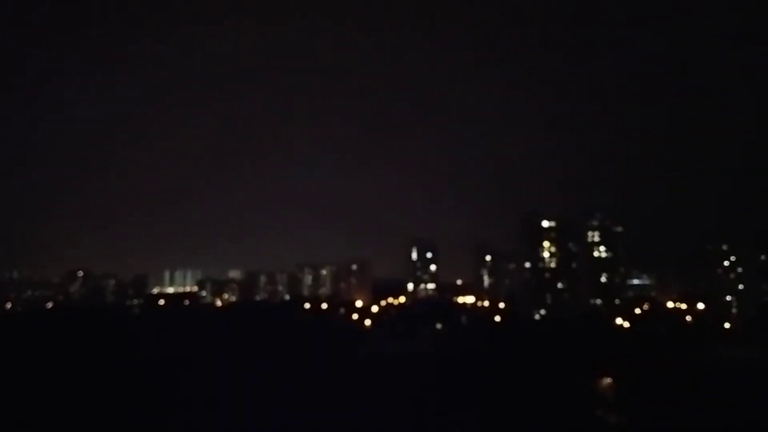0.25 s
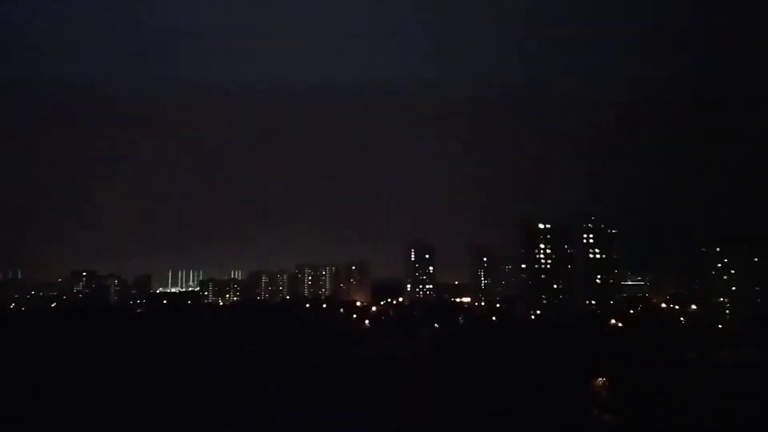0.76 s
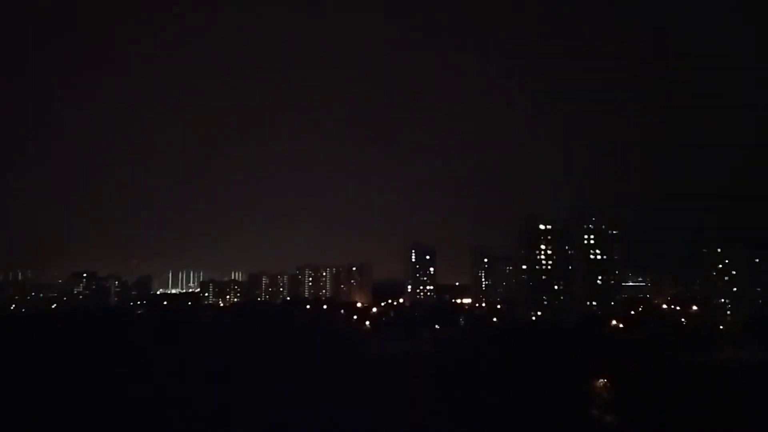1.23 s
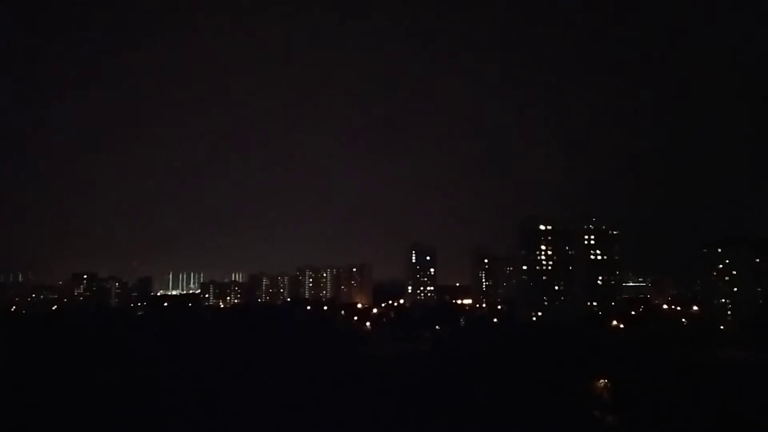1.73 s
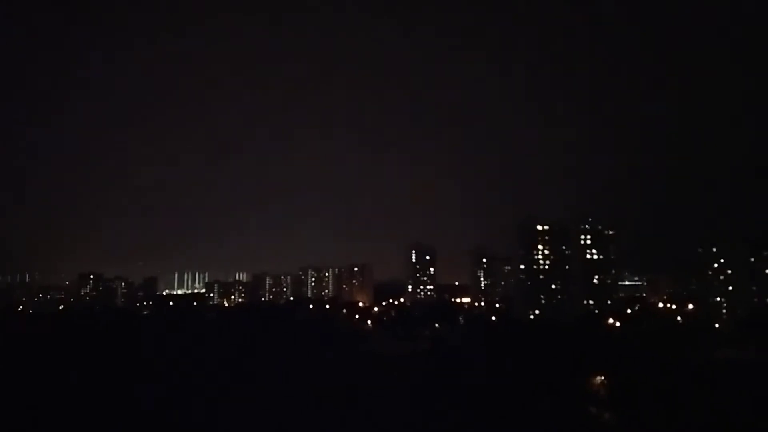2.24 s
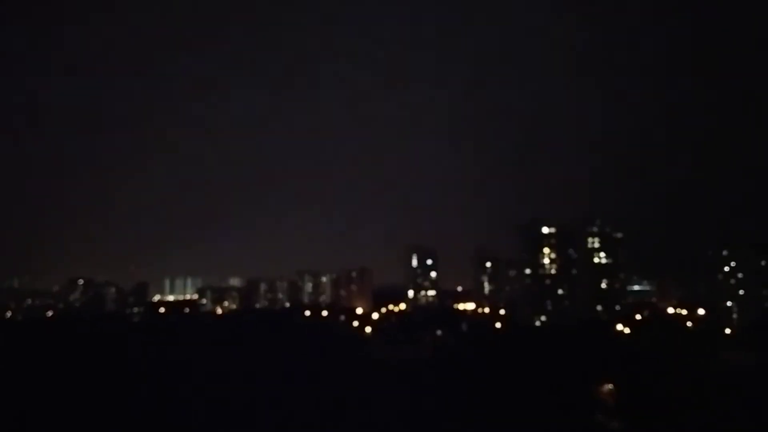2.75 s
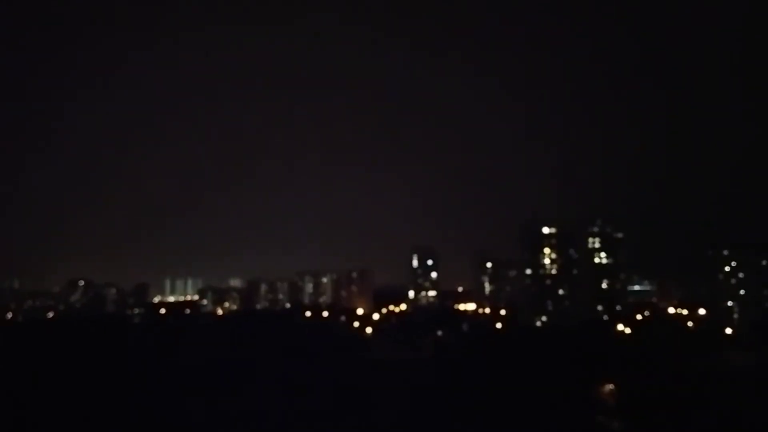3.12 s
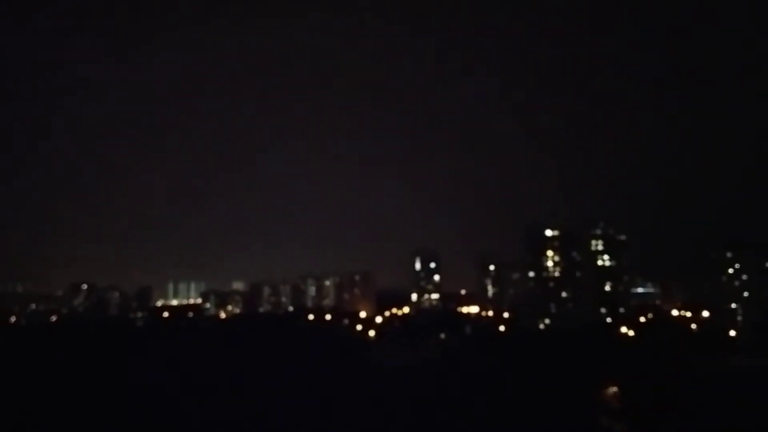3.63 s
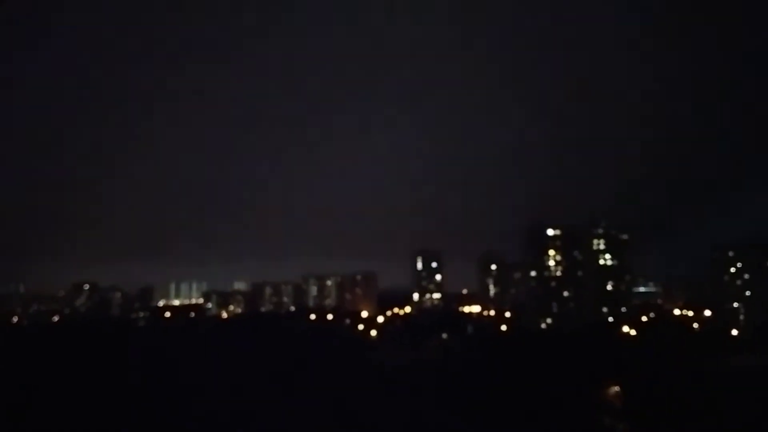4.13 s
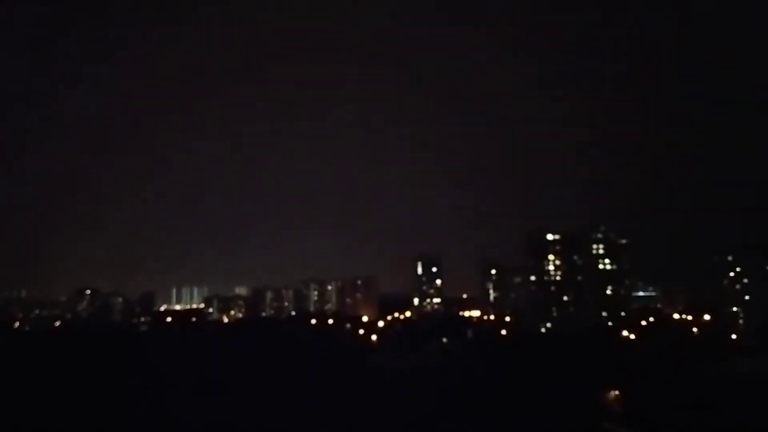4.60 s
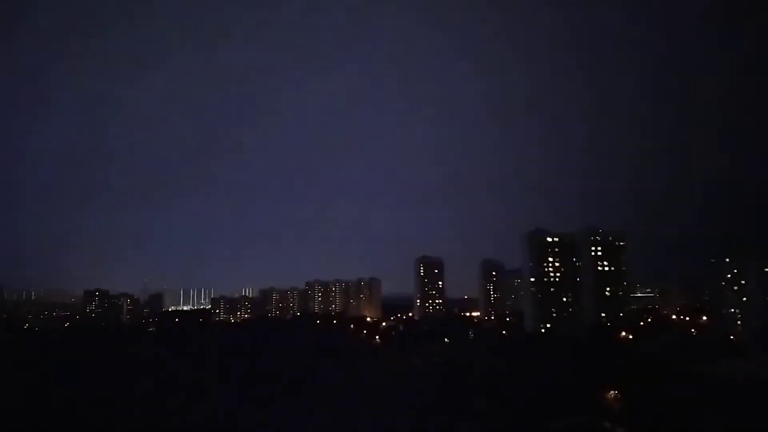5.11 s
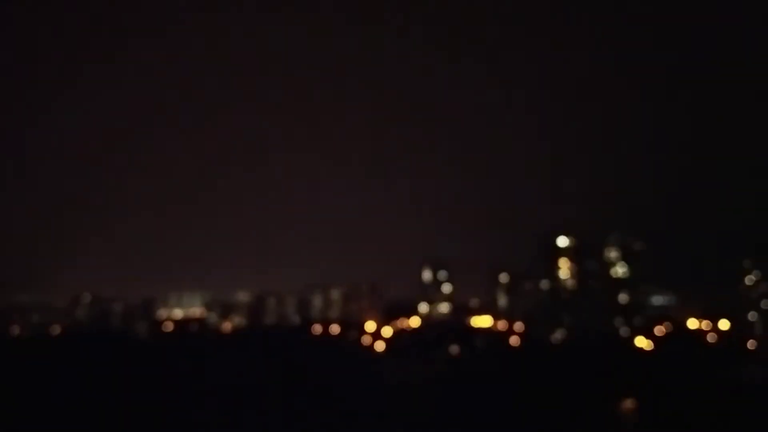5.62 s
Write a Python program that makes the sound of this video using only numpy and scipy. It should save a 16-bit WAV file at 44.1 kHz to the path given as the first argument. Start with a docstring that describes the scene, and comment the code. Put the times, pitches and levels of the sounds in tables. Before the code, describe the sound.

Thunder heard from a high open window over a city at night, picked up by a phone. Heavy low claps tumble at once, thin to a rumble after a second, then a brighter, harder burst cracks around two and a half seconds. Weaker knocks and rumbles follow to the end, over very faint hiss and sparse tiny drips.

```python
"""Thunder over a city at night, heard by a phone at an open window high above the roofs.
Shock fronts from the crooked lightning channel, smeared by house fronts, roll on from the start.
A first group of claps fades by 1.4 s, a bright second one peaks near 2.65 s, weaker ones follow to the end.
Hiss swells and two faint chirps sound from about 4 s; steady hiss, drips and thin whine lie under it all.
Thunder is N-wave noise in four levelled bands; the rest is filtered noise, short rings and sines."""
import sys
import numpy as np
from scipy import signal
from scipy.fft import rfft, irfft
from scipy.io import wavfile
from scipy.ndimage import uniform_filter1d, minimum_filter1d

SR = 44100
rng = np.random.default_rng(int(sys.argv[2]) if len(sys.argv) > 2 else 0)


def file_out(sig):
    """Save sig as 16-bit WAV at sys.argv[1]."""
    # one column per channel
    cols = np.atleast_2d(sig).T
    # limit, then scale
    lim = np.clip(cols, -1, 1)
    pcm = np.round(lim * 32767).astype(np.int16)
    wavfile.write(sys.argv[1], SR, pcm)


N = 258426
TIME = np.arange(N) / SR
FREQ = np.fft.rfftfreq(N, 1 / SR) + 1e-3  # offset keeps log(FREQ) finite

# roll between claps: t/s, boom level/dB, body level/dB, crackle level/dB, sharp edge level/dB
ROLL_LEVELS = [(0, -25, -31.5, -41, -53.5), (.7, -29.5, -35.5, -42.5, -51.5), (1.2, -29, -40.5, -43.5, -53),
               (1.5, -32, -38.5, -46, -57), (1.9, -34.5, -41.5, -44.5, -51.5),
               (2.23, -34.5, -39, -47.5, -55.5), (3.201, -36, -35.5, -44, -53), (3.8, -33, -36, -45, -56),
               (4.22, -37.5, -37.5, -43, -57), (4.75, -35, -34.5, -47, -59.5),
               (5.301, -34, -34.5, -44, -60), (5.86, -32.5, -36.5, -48, -62.5)]
# claps: t/s, boom level/dB, brightness/dB, extra body/dB, rise/s, fade constant/s
CLAP_EVENTS = [(.045, -27, -13, 13, 0.012, 0.025), (0.19, -16.5, -2, 1.5, 0.025, 0.11),
               (.243, -27, 6.5, 4, 0.0083, 0.068), (.335, -18.5, 1, -5.5, 0.0069, 0.057),
               (.388, -16, -3.5, -8, 0.011, 0.034), (.428, -18, -6, -2, 0.0086, 0.069),
               (.7, -24, -0.5, -6, 0.01, 0.037), (0.778, -20.5, -8, 1, 0.013, 0.056),
               (.838, -31, -2, 9, 0.027, .025), (0.891, -18.5, -6, 3, 0.011, 0.011),
               (.95, -25.5, -1, 0, 0.0094, 0.042), (1.04, -19, -12, 1, 0.0072, 0.023),
               (1.11, -20.5, -16, 5, 0.0085, 0.025), (1.17, -25, -16, -8, 0.019, 0.046),
               (1.235, -25.5, -1.5, -8, 0.017, 0.067), (1.345, -28, -13, -4, 0.0093, 0.013),
               (1.82, -48, 16, 0, .015, .037), (1.975, -28, -9, -5, 0.014, 0.029),
               (2.305, -36, 11.5, 0.5, 0.041, 0.065), (2.335, -26.5, -15, -5, 0.015, 0.051),
               (2.42, -25.5, 6, -4, 0.059, 0.44), (2.552, -27.5, 12.5, -0.5, 0.023, 0.31),
               (2.552, -32, 10.5, 6.5, 0.01, .03), (2.617, -20, 7, 1.5, 0.0085, 0.11),
               (2.645, -20, 10, 4, 0.019, 0.01), (2.726, -18, 3.5, 4.5, 0.0082, 0.029),
               (2.799, -21, 2, 4, 0.007, 0.059), (2.88, -20, 3, -2.5, 0.014, 0.19),
               (3.011, -15.5, -6, -2, 0.008, 0.032), (3.135, -24.5, -10, -7, 0.011, 0.036),
               (3.26, -29, -5, 8, 0.0078, 0.015), (3.385, -45, 4, 15, 0.0082, 0.021),
               (3.557, -25.5, 3, -13, 0.014, 0.017), (3.665, -35.5, 7, 1, 0.014, 0.028),
               (3.76, -40, -5, -1, 0.013, .06), (3.945, -36, 2, 1, 0.018, .025),
               (4.008, -28.5, -4.5, 11, 0.024, 0.031), (4.06, -30, -3.5, 4.5, 0.022, 0.086),
               (4.31, -37, 7, 5.5, 0.035, 0.047), (4.475, -34, -3, 5, 0.0074, 0.097),
               (4.565, -39, 3, 2, 0.024, .04), (4.795, -25.5, 2, 2, 0.017, 0.03),
               (4.95, -39, 7, 2, 0.0065, 0.016), (5.018, -26, -2.5, 2.5, 0.021, 0.035),
               (5.143, -30.5, -1, 4, 0.012, 0.14), (5.42, -32.5, 0.5, 6, 0.02, 0.056),
               (5.505, -16.5, -7.5, 3, 0.018, 0.022), (5.52, -28.5, 2, 3, 0.016, 0.076),
               (5.649, -24, -8, 8.5, .025, 0.038)]
# clap bands, boom to sharp edge: level re boom/dB, share of brightness/1, share of extra body/1
CLAP_BANDS = [(-1, 0.04, 0), (-6.5, 0.88, 1), (-16, 1.22, 0), (-29.5, 1.41, 0.12)]
# upper ends of boom, body, crackle and sharp edge: f/Hz
BAND_TOPS_HZ = [260.5, 579, 1387, 4000]
# centres of brief dips in roll level: t/s
LULL_TIMES_S = [0.145, .745, 1.295, 1.865, 2.055, 2.21, 3.305, 4.19, 4.675, 4.75, 4.895, 5.365]
LULL_DB, LULL_WIDTH_S = -2, 0.013
# thunder colour after its way through the air: f/Hz, gain/dB
AIR_GAIN = [(25, -38), (35, -26.5), (55, -18.5), (85, -2.5), (110, 2.5), (220, 0), (290, -3.5), (380, -5.5),
            (520, -7.5), (800, -10), (1150, -19), (2000, -38), (2600, -45), (3400, -67.5)]
# resonances of the window recess: f/Hz, width/Hz, lift/dB
RECESS_MODES = [(180.6, 39, 2), (224, 30, 4), (292.3, 13, 6), (464, 27, 5), (509.5, 33, 5), (567, 13, 1.5),
                (755, 38, 1.5), (847, 100, 1.5), (1044, 28, 3), (1154, 94, 4.5), (1540, 61, 4),
                (1880, 60, 6)]
# microphone ports, level difference: f/Hz, left minus right/dB
PORT_BALANCE = [(60, 13.6), (240, 13.3), (340, 12.26), (405, 10.3), (460, .3), (500, -2), (600, 1.8),
                (750, 0), (1000, 1), (1130, -1), (1330, 3.45), (1700, -.5), (2200, -4.5), (3000, -3)]
# microphone ports, likeness of their sound: f/Hz, likeness/1
PORT_LIKENESS = [(100, 1), (200, 0.89), (310, 0.94), (500, .94), (630, .69), (730, .88), (900, 1),
                 (970, 0.32), (1400, 0.21), (2500, 0.45)]
# microphone ports, phase lead of the left: f/Hz, phase/rad
PORT_LEAD = [(150, 0.09), (260, 0.19), (520, 0.15), (750, 0.25), (870, -0.68), (1020, .35), (1290, 1.1),
             (1380, -.4), (1650, -2.05), (2100, -1.3), (2300, 0)]
# hollow in the low mids, gain at its centre: t/s, gain/dB
HOLLOW_GAIN = [(0, -6), (1.5, 0), (2.65, -4), (2.95, 2), (3.4, 1.5), (5.86, 2)]
HOLLOW_HZ, HOLLOW_WIDTH_HZ = 366, 150
# recess ringing after hard fronts: t/s, level/dB, f/Hz, rise/s, fade constant/s
RING_EVENTS = [(.205, -22, 300, 0.033, 0.026), (2.558, -18.5, 263, 0.014, 0.035),
               (2.567, -20, 503, 0.017, 0.024), (2.635, -29, 765, 0.016, 0.02),
               (2.65, -15, 473, 0.012, 0.01)]
RING_WIDTH_HZ = 72
# bassless crackle from thin channel branches: t/s, level/dB, f/Hz, width/Hz, rise/s, fade constant/s
CRACKLE_BURSTS = [(.222, -32, 1030, 300, .028, 0.025), (.41, -40, 1000, 350, 0.018, .06),
                  (1.655, -38, 1120, 600, 0.031, 0.014), (1.69, -53, 1600, 500, 0.017, 0.037),
                  (2.345, -40, 1550, 650, 0.018, .018), (2.885, -46, 1600, 500, 0.016, .03),
                  (3.555, -53, 1570, 500, .015, .02), (3.745, -50, 1530, 500, 0.022, 0.022),
                  (4.05, -50, 1480, 500, 0.013, 0.024), (4.26, -55, 1500, 450, .02, .07),
                  (4.8, -49, 1240, 550, 0.03, 0.022), (5.525, -61, 1450, 500, .015, 0.023),
                  (5.665, -40, 730, 250, 0.027, 0.023)]
# faint chirps, before left trim: t/s, level/dB, f/Hz, width/Hz, rise/s, fade constant/s
CHIRP_EVENTS = [(4.145, -57, 2796, 20, .035, .03), (4.875, -59, 2480, 190, .03, .045)]
SWELL_S, SWELL_WIDTH_S, SWELL_HZ, SWELL_WIDTH_HZ = 4.22, 0.25, 7520, 970
# steady hiss density: f/Hz, left level/dB per Hz, right level/dB per Hz
HISS_DENSITY = [(100.2, -75, -81), (1470, -88, -90), (2420, -95, -88.5), (3080, -95.5, -93.5),
                (4750, -98, -96), (4720, -109, -105), (6130, -104, -99.5), (7300, -100, -94.5),
                (8430, -100, -102), (9600, -101, -114), (10360, -107, -121), (11700, -115, -115),
                (14000, -118, -118)]
# clear drips on the sill, before left and right trims: t/s, peak level/dB, f/Hz
CLEAR_DRIPS = [(0.5452, -55, 7600), (1.8377, -57, 7350), (2.3092, -57, 7500), (3.2096, -57, 7590),
               (3.5084, -58, 7080), (3.8202, -56, 7550), (5.1173, -48, 7100), (5.442, -49, 7430),
               (5.4789, -55, 7430), (5.8137, -59, 7700)]
# electrical whine, mid-flicker amplitude: f/Hz, left level/dB, right level/dB
WHINE_TONES = [(2670, -80, -68), (2760, -86, -71), (2787, -86, -75), (3020, -68.5, -85), (3229, -86, -87.5),
               (3500, -83, -87), (3660, -85, -84), (4452, -85.5, -75)]
CEILING, LIMITER_S, TOP_HZ = .74, .006, 14200  # ceiling re full scale


def thunder():
    """Roll and clap energies add in each band, boom to sharp edge; both drive one stream of fronts."""
    lead = np.exp(1j * shape(PORT_LEAD) * np.array([[1], [0]]))
    stream = filtered(hollowed(shock_stream()), lead)
    roll_s, *roll_db = np.transpose(ROLL_LEVELS)
    bands = np.diff([0 * FREQ] + [below(hz) for hz in BAND_TOPS_HZ], axis=0)
    _, boom_db, bright_db, body_db, _, _ = np.transpose(CLAP_EVENTS)
    clap_energy = np.array([clap(s, rise, fade) ** 2 for s, *_, rise, fade in CLAP_EVENTS])
    lull_db = LULL_DB * sum(bump(s, LULL_WIDTH_S) for s in LULL_TIMES_S)
    out = rings(stream)
    for band, level_db, (colour_db, bright_share, body_share) in zip(bands, roll_db, CLAP_BANDS):
        roll = undb(np.interp(TIME, roll_s, level_db) + lull_db)
        clap_db = boom_db + colour_db + bright_share * bright_db + body_share * body_db
        level = np.sqrt(roll ** 2 + undb(clap_db) ** 2 @ clap_energy)
        out = out + steady(filtered(stream, band), span_s=0.034) * level
    return out


def shock_stream():
    """Long waves reach both ports alike, short ones differ; air and window recess colour them."""
    shared, apart = (
        roofs(shock_fronts(per_s=1700, length_s=.005, spread_db=2.5), smear_s=0.12, echo_db=-4.0)
        for _ in range(2))
    likeness = np.clip(shape(PORT_LIKENESS), -1, 1)
    side = np.array([[1], [-1]])
    common = filtered(shared, np.sqrt(1 + likeness))
    stream = common + side * filtered(apart, np.sqrt(1 - likeness))
    recess_db = sum(db * resonance(hz, width_hz) for hz, width_hz, db in RECESS_MODES)
    ports = 2 / (1 + undb(-side * shape(PORT_BALANCE)))
    return filtered(stream, undb(shape(AIR_GAIN) + recess_db) * ports)


def shock_fronts(per_s, length_s, spread_db):
    """Pressure slope of scattered N-waves: a jump, a steady fall, a second jump."""
    chance = rng.random((N, 3))
    start = np.flatnonzero(chance[:, 0] < per_s / SR)
    size = undb(-spread_db * np.log(np.maximum(chance[start, 1], .01)))
    length = np.maximum(length_s * SR * (.5 + chance[start, 2]), 2).astype(int)
    end = start + length

    def at(where, weight):
        """Sum of weights landing on each sample."""
        return np.bincount(where, weight, 2 * N)[:N]

    fall = 2 * size / length
    jumps = at(start, size) + at(end, size)
    return jumps - np.cumsum(at(start, fall) - at(end, fall))


def roofs(x, smear_s, echo_db):
    """House fronts scatter each shock into a decaying noise tail, drawn afresh per call."""
    keep = np.exp(-1 / (smear_s * SR))
    energy = signal.lfilter([1 - keep], [1, -keep], x ** 2)
    return x + undb(echo_db) * np.sqrt(energy) * rng.standard_normal(N)


def hollowed(x):
    """Cut or lift the low mids with one resonance whose gain moves in time."""
    part = filtered(x, resonance(HOLLOW_HZ, HOLLOW_WIDTH_HZ))
    return x + (undb(np.interp(TIME, *np.transpose(HOLLOW_GAIN))) - 1) * part


def clap(start_s, rise_s, fade_s):
    """Envelope of a burst: linear build-up, exponential decay."""
    age_s = TIME - start_s
    return np.clip(age_s / rise_s, 0, 1) * np.exp(-np.maximum(age_s - rise_s, 0) / fade_s)


def rings(stream):
    """The window recess answers hard fronts with a brief hollow note: the stream in one resonance."""
    out = 0
    for s, db, hz, rise_s, fade_s in RING_EVENTS:
        note = steady(filtered(stream, resonance(hz, RING_WIDTH_HZ)), span_s=0.036)
        out = out + undb(db) * note * clap(s, rise_s, fade_s)
    return out


def bursts(events, span_s):
    """Sum of resonant noise bursts, each levelled and then shaped by its envelope."""
    out = 0
    for s, db, hz, width_hz, rise_s, fade_s in events:
        out = out + undb(db) * steady(rush(hz, width_hz), span_s) * clap(s, rise_s, fade_s)
    return out


def crackles(top_hz):
    """Short rough puffs of resonant noise, dulled by the air."""
    return filtered(bursts(CRACKLE_BURSTS, span_s=.03), below(top_hz))


def chirps(left_db):
    """Short high notes to the right, made of narrow noise."""
    return bursts(CHIRP_EVENTS, span_s=.05) * undb([[left_db], [0]])


def swell(left_db, right_db):
    """High resonant hiss that rises and falls once, mostly on the right."""
    noise = rush(SWELL_HZ, SWELL_WIDTH_HZ)
    return noise * bump(SWELL_S, SWELL_WIDTH_S) * undb([[left_db], [right_db]])


def hiss():
    """Even noise of set spectral density, unrelated at the two ports."""
    density_db = np.array([shape(HISS_DENSITY, axis=1), shape(HISS_DENSITY, axis=2)])
    return filtered(rng.standard_normal((2, N)), undb(density_db) * np.sqrt(SR / 2))


def drips(left_db, right_db, faint_db, count=40):
    """A few clear drips among many faint ones, all to the right."""
    faint = [(u * N / SR, faint_db + 5 * v, 7000 + 800 * w) for u, v, w in rng.random((count, 3))]
    out = np.zeros((2, N + SR))
    for s, db, hz in list(CLEAR_DRIPS) + faint:
        ring = drip(hz, ring_s=0.0022, width_hz=200)
        start = max(int(s * SR), 0)
        out[:, start:start + ring.shape[1]] += undb(db) * ring
    return out[:, :N] * undb([[left_db], [right_db]])


def drip(hz, ring_s, width_hz):
    """A drop's tiny splash: narrow noise that swells and fades within milliseconds, peak 1."""
    t = TIME[:2048]
    freq = np.fft.rfftfreq(len(t), 1 / SR)
    spectrum = rfft(rng.standard_normal((2, len(t))))
    spray = irfft(spectrum / (1 + (2 * (freq - hz) / width_hz) ** 2))
    ring = spray * t * np.exp(-t / ring_s)
    return ring / np.abs(ring).max(axis=1, keepdims=True)


def whine(waver_hz, flicker_db):
    """Faint sines that waver slowly in pitch and level; both settings are rms."""
    out = 0
    for hz, left_db, right_db in WHINE_TONES:
        drift, flicker = filtered(rng.standard_normal((2, N)), below(12))
        phase = 2 * np.pi * np.cumsum(hz + waver_hz * drift / drift.std()) / SR
        level = undb([[left_db], [right_db]]) * undb(flicker_db * flicker / flicker.std())
        out = out + level * np.sin(phase)
    return out


def rush(hz, width_hz):
    """Stereo noise in one resonance, rms 1."""
    x = filtered(rng.standard_normal((2, N)), resonance(hz, width_hz))
    return x / x.std()


def undb(db):
    """Decibels to gain."""
    return 10 ** (np.asarray(db) / 20)


def shape(points, axis=1):
    """One column of a table over frequency, joined on a log axis."""
    table = np.array(points)
    return np.interp(np.log(FREQ), np.log(table[:, 0]), table[:, axis])


def filtered(x, gain):
    """Apply a gain per frequency."""
    return irfft(rfft(x) * gain, N)


def below(hz):
    """Gain of a steep low-pass, 1/2 at its corner."""
    return 1 / (1 + (FREQ / hz) ** 8)


def resonance(hz, width_hz):
    """Gain of one resonance, 1 at its centre."""
    return 1 / (1 + (2 * (FREQ - hz) / width_hz) ** 2)


def bump(middle_s, width_s):
    """Gaussian in time, peak 1."""
    return np.exp(-.5 * ((TIME - middle_s) / width_s) ** 2)


def steady(x, span_s):
    """Bring the mean of both channels to a running rms of 1."""
    size = int(span_s * SR)
    power = uniform_filter1d(uniform_filter1d(x.mean(axis=0) ** 2, size), size)
    return x / np.sqrt(power + 1e-18)


def limited(x):
    """Turn the gain down smoothly around peaks that pass the ceiling."""
    size = int(LIMITER_S * SR)
    gain = CEILING / np.maximum(np.abs(x).max(axis=0), CEILING)
    held = minimum_filter1d(gain, 2 * size)
    return x * uniform_filter1d(uniform_filter1d(held, size), size)


def scene():
    """Thunder over the quiet night."""
    storm = thunder() + crackles(top_hz=2200)
    night = chirps(left_db=-8) + swell(left_db=-80, right_db=-61.0) + hiss()
    night = night + drips(left_db=-12, right_db=4.5, faint_db=-64.0)
    return storm + night + whine(waver_hz=3, flicker_db=2.5)


def record(dry):
    """Fade in over 4 ms, drop the deepest bass, limit the peaks and cut the top."""
    opening = np.sin(np.pi / 2 * np.minimum(TIME / .004, 1)) ** 2
    bass_cut = signal.butter(6, 50, "high", fs=SR, output="sos")
    top_cut = signal.ellip(10, .1, 80, TOP_HZ, fs=SR, output="sos")
    thinned = signal.sosfilt(bass_cut, dry * opening)
    return signal.sosfilt(top_cut, limited(thinned))


dry = scene()
out = record(dry)
file_out(out)
```